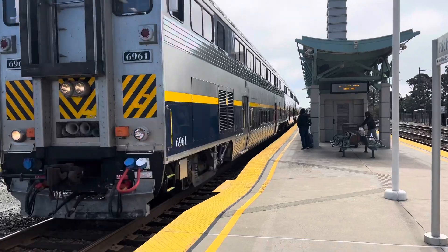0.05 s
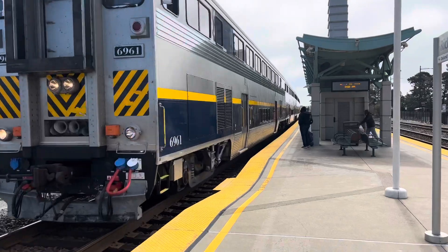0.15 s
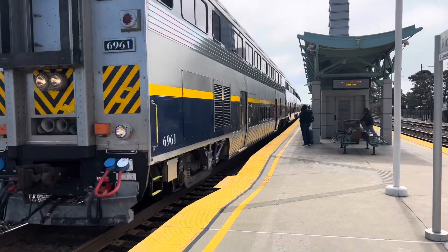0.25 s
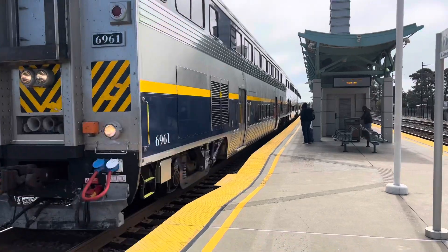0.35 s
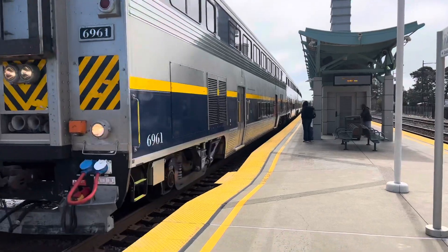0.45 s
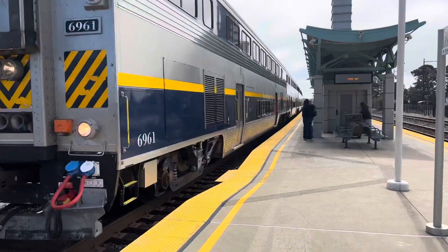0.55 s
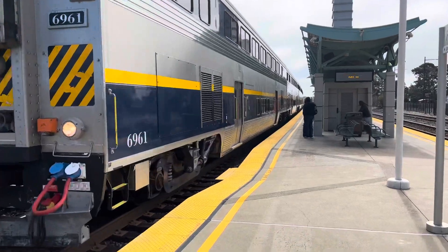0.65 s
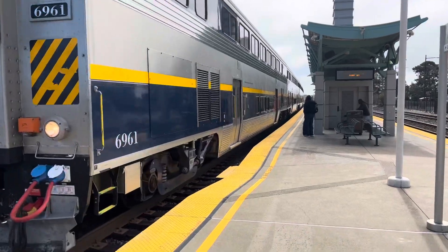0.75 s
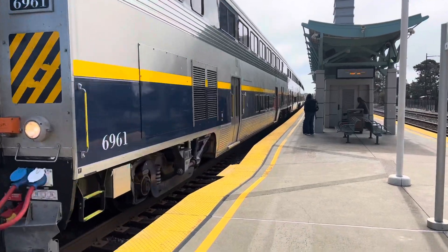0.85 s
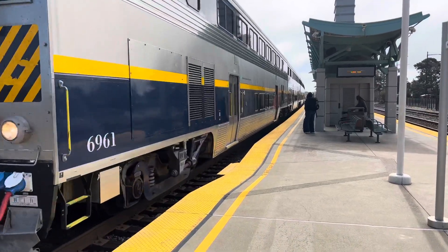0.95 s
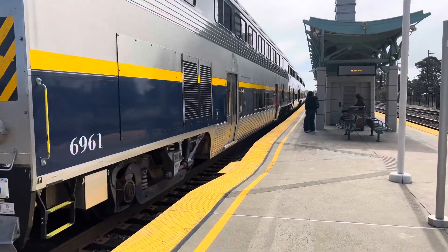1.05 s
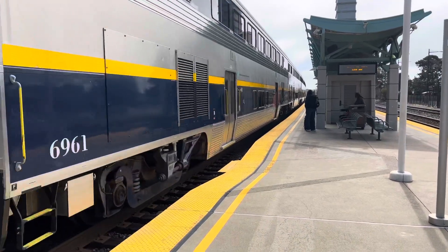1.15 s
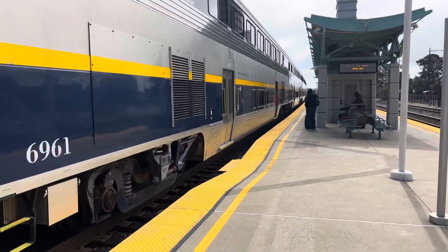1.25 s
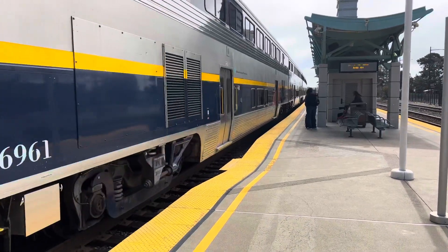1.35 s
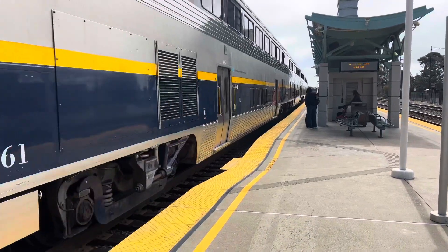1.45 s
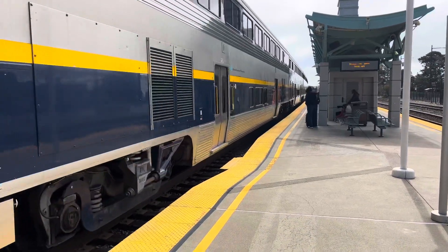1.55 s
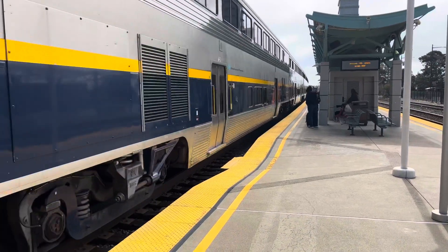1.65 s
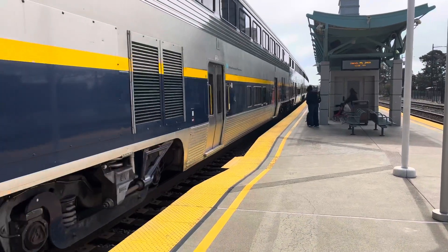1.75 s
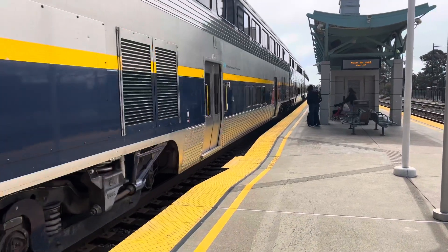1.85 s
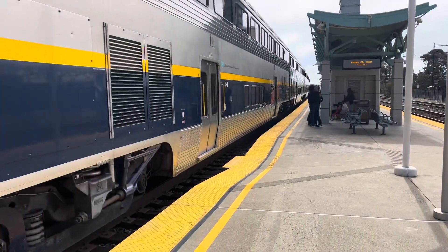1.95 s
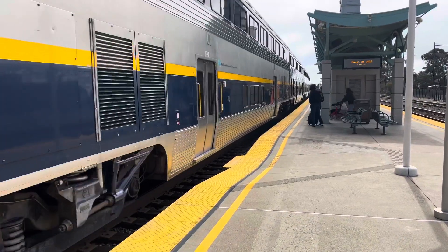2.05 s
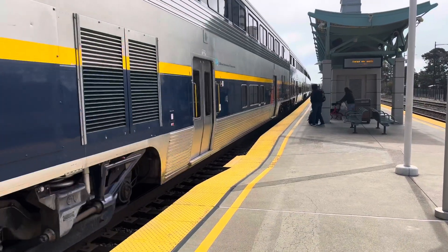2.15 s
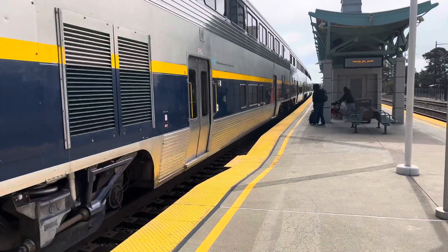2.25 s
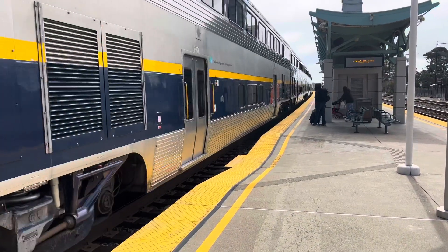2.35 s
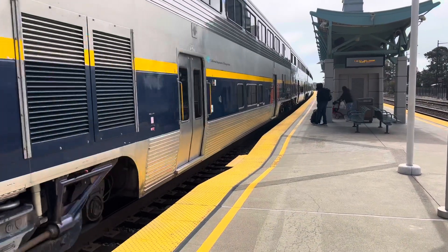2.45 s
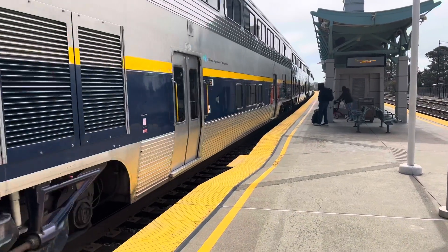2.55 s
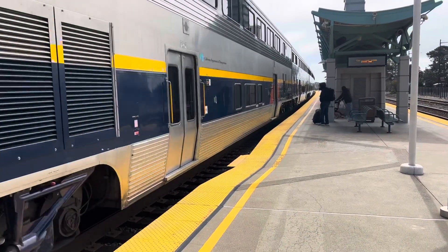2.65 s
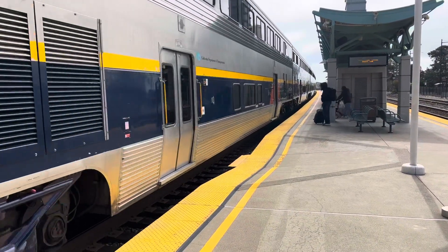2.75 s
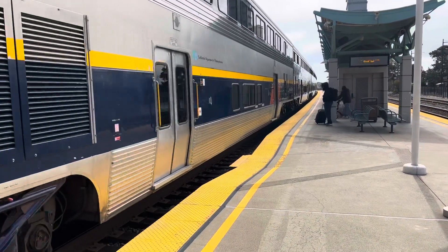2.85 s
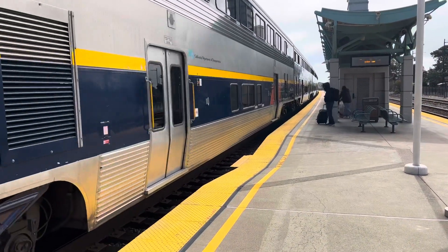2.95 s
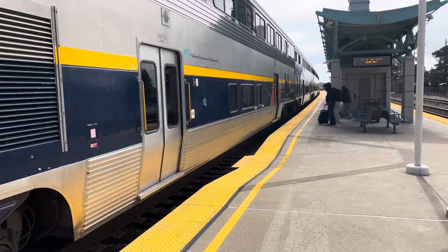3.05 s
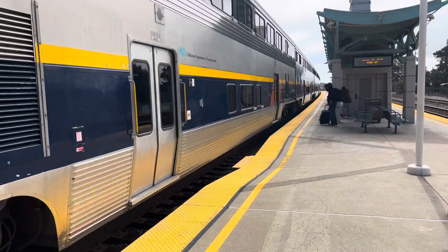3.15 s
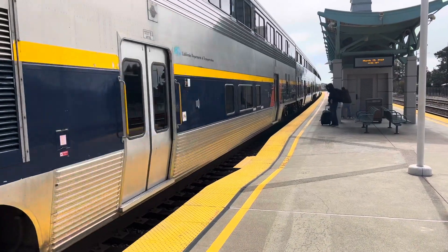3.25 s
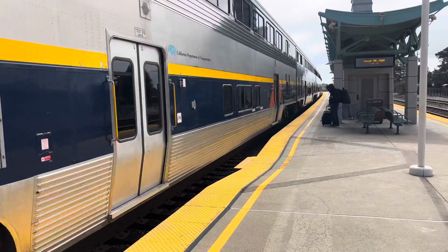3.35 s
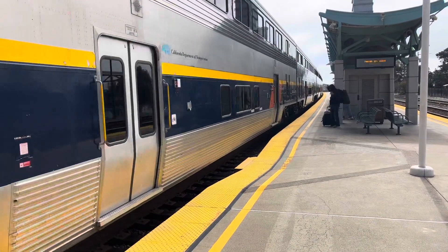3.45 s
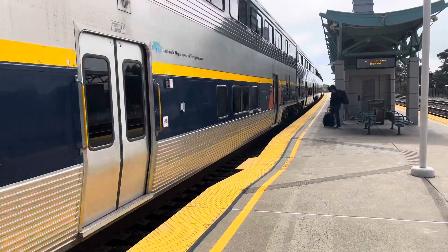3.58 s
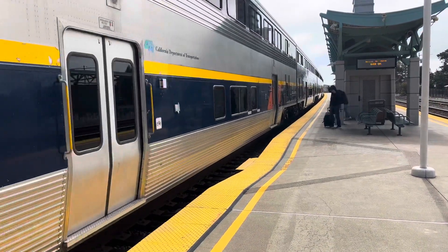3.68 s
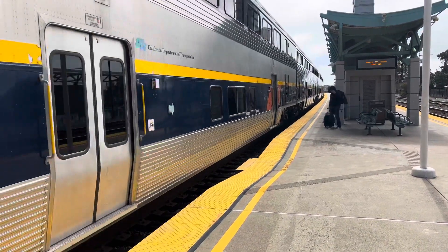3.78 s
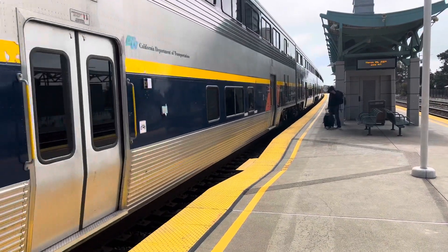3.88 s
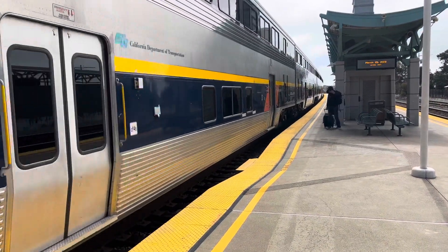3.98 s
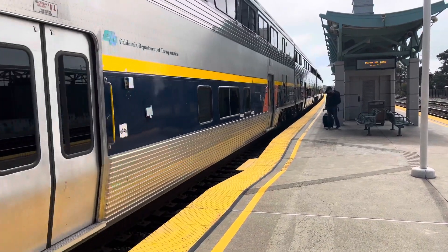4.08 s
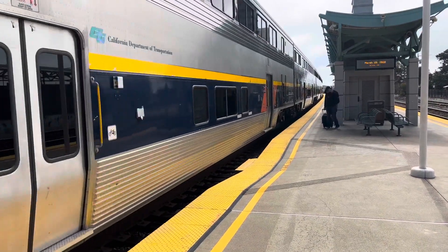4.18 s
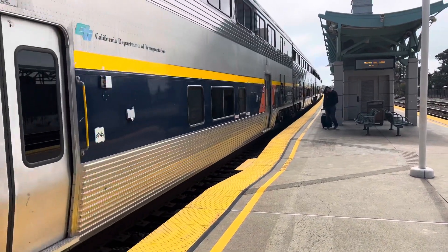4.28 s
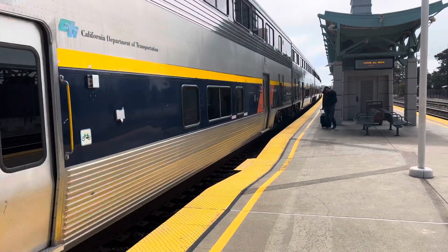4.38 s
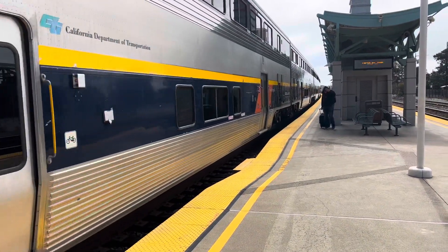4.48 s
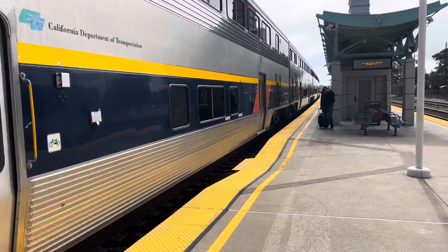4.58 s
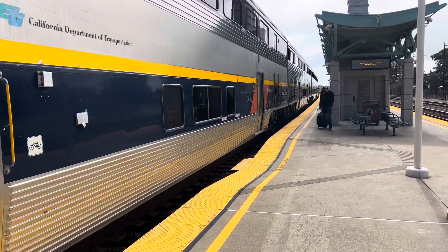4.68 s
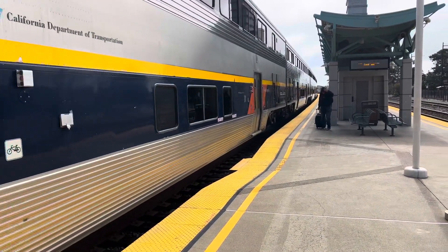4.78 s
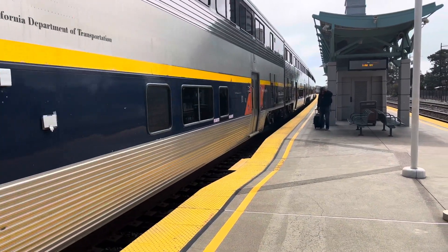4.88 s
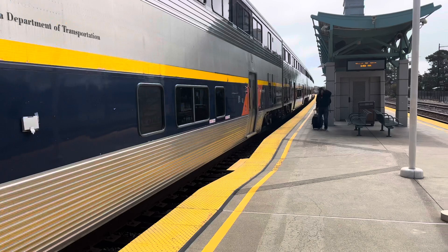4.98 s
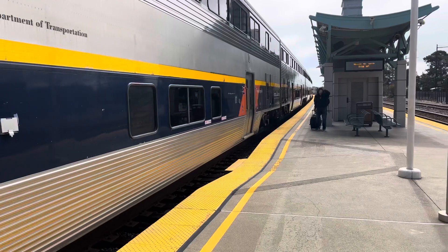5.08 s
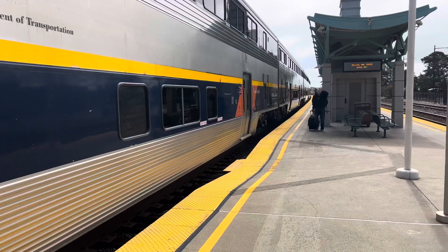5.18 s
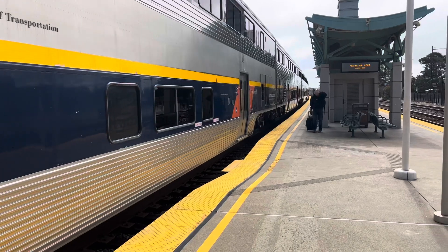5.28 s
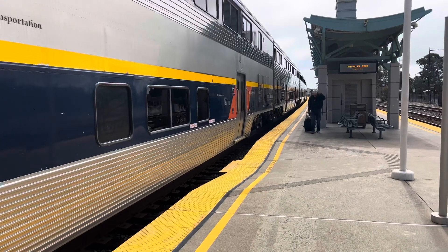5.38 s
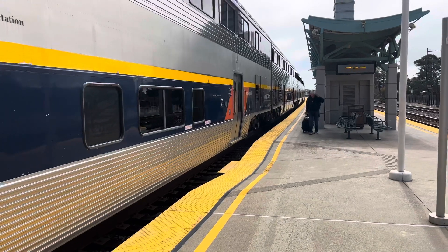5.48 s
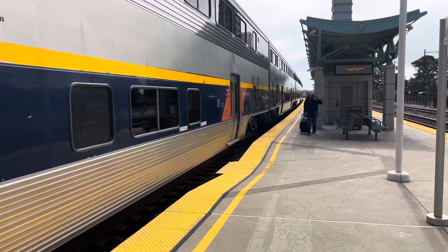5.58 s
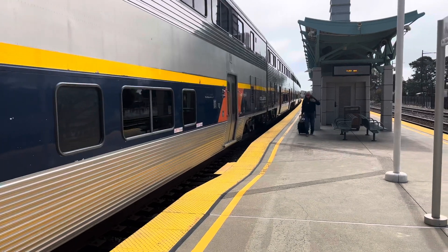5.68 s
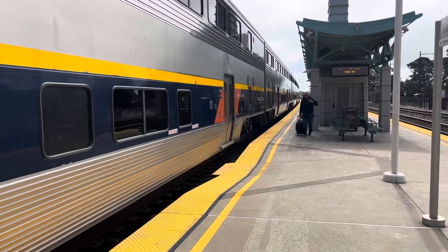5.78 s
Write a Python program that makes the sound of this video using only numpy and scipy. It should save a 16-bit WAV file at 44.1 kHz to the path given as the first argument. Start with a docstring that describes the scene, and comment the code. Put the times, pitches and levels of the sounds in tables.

```python
"""The air-driven bell of a passenger train rings every three quarters of a second as it creeps past a platform.
Each blow restarts decaying partials that fade and smear, likely by echoes off the moving cars; noise makes the knock.
A valve puffs and hisses before each blow heard to start: shaped noise through cavities, with ringing metal ticks.
Two spaced microphones also pick up buffeting draught and rolling wheels (noise), a faint squeal and a machine hum."""
import sys
import numpy as np
from scipy import signal
from scipy.io import wavfile
from scipy.ndimage import uniform_filter1d, minimum_filter1d

SR = 44100
rng = np.random.default_rng(int(sys.argv[2]) if len(sys.argv) > 2 else 0)


def linear_from_db(decibels):
    """Turn decibels (scalar or array-like) into linear amplitude factors; 0 gives 1."""
    return 10 ** (np.asarray(decibels, float) / 20)


def pcm_store(signal):
    """Save signal as 16-bit PCM."""
    levels = np.round(np.clip(np.atleast_2d(signal), -1, 1) * 32767)
    wavfile.write(sys.argv[1], SR, levels.astype(np.int16).T)


N = 256662
T = np.arange(N) / SR
DULL_HZ = 7000  # the treble slope of distance starts here

# Blows of the clapper. Each row: start in seconds, knock level in dB before its trim, gains in dB of the second,
# third, fourth and higher partials, then radians by which left leads in the second, third and fourth.
BLOWS = [(-0.34, -35, 2, -2, 0.5, 4, 4, 2.7, 4.5), (0.398, -6.5, -0.5, -0.5, 0, 1, 1.5, -1.5, 1.34),
         (1.1336, -4.5, 3.5, 4, -1.5, 0, -2.5, 4, 1.3), (1.8724, -3.5, -1.5, 5.5, -1.5, 1, -2, -1.2, 1.5),
         (2.6173, -5, -2.5, 6, -4, -1.5, 0.3, 1.63, -0.9), (3.355, -9, -3.5, 2.5, -2.5, -2.5, 1, -1, -1.64),
         (4.1015, -16.5, -5.5, 2.5, -6, -8.5, -1.5, 0, -2.1),
         (4.8434, -20, -10, -9.5, -6, -8, 1, 0.57, -2.5), (5.588, -27.5, -3, -8, -9.5, -8, -3.0, 1.56, -3)]
# The bell going by. Each row: time in seconds, Doppler shift in percent, lead of the left microphone in ms,
# level of left over right in dB.
PASSING = [(0, 0.46, 0.23, -3.5), (1.2, 0.39, 0.22, -1), (2.1, .33, 0.24, -2.1), (3, 0.0064, 0.43, 0.5),
           (3.5, -.22, 0.4, 0), (5.82, -0.29, .4, -1)]
# Openings of the valve. Each row: start in seconds, air level in dB before the stroke and cavities shape it,
# treble slope in dB per octave.
PUFFS = [(0.125, -31.5, -9.5), (0.8614, -31.5, -8.5), (1.598, -31.5, -1), (2.3406, -32, -3),
         (3.0786, -34, -5), (3.823, -40, -8.5), (4.564, -41, -14.5), (5.3088, -43.5, -16)]


def rows_at(rows, t):
    """Each column of a curve table at the times t."""
    s, *columns = np.transpose(rows)
    return np.array([np.interp(t, s, c) for c in columns])


def read(points, hz):
    """A spectrum interpolated on a log-frequency axis."""
    f, value = np.transpose(points)
    return np.interp(np.log(hz + 1), np.log(f + 1), value)


def unit(points, hz):
    """A spectrum in dB shifted so that its bins have a mean power of one."""
    db = read(points, hz)
    return db - 10 * np.log10(np.mean(linear_from_db(db) ** 2))


def evened(x):
    """Scaled to rms 1."""
    return x / np.sqrt(np.mean(abs(x) ** 2) + 1e-20)


def add(mix, s, sound):
    """Adds a sound that starts at s seconds, cut to the length of the mix."""
    at = round(s * SR)
    part = mix[..., max(at, 0):max(at + sound.shape[-1], 0)]
    part += sound[..., max(-at, 0):][..., :part.shape[-1]]


def noise(level_db, size, same, patchy_db, flicker_db):
    """Random short-time spectra shaped by level_db(hz, t); the part common to both sides arrives left first."""
    hop = size // 4
    hz = np.fft.rfftfreq(size, 1 / SR)[:, None]
    t = np.arange(N // hop + 5) * hop / SR
    a, b, c, d, patches = rng.standard_normal((len(t), len(hz), 5)).T
    # patches cover neighbouring bins and frames; flicker moves all bins of one side together
    patches = uniform_filter1d(patches, size=5, axis=0)
    patches = evened(uniform_filter1d(patches, size=6, axis=1))
    flicker = evened(uniform_filter1d(rng.standard_normal((2, 1, len(t))), size=2, axis=2))
    lead_s = rows_at(PASSING, t)[1] / 1000
    late = np.exp(-2j * np.pi * hz * lead_s)
    same = np.clip(same, 0, 1)
    left, own = a + 1j * b, c + 1j * d
    right = same * late * left + np.sqrt(1 - same ** 2) * own
    z = np.array([left, right])
    z *= linear_from_db(level_db(hz, t)) * evened(linear_from_db(patchy_db * patches + flicker_db * flicker))
    return signal.istft(z, nperseg=size, noverlap=size - hop)[1][:, :N] / np.sqrt(size / 3)


def wander(width_hz, shared=0.):
    """Complex slow chance for each side, low-passed at width_hz; a shared part of the power is common to both."""
    step = 64  # samples between the drawn values
    z = rng.standard_normal((3, N // step + 2, 2)) @ [1, 1j]
    smoother = signal.butter(3, np.clip(width_hz, .5, 300), fs=SR / step, output="sos")
    z = evened(signal.sosfilt(smoother, z))
    z = np.sqrt(1 - shared) * z[1:] + np.sqrt(shared) * z[0]
    return np.array([np.interp(np.arange(N) / step, np.arange(len(v)), v) for v in z])


def bell(rise_s=0.0052):
    """Every blow restarts the modes; echoes off moving walls are slightly detuned, more so for high modes."""
    # The bell's modes. Each row: frequency in Hz, level in dB, t60 in seconds, left over right in dB.
    modes = [(1105.3, -20.5, 3.06, 2.6), (2082, -13.5, 0.59, 0), (2330.8, -20, 1.126, -2),
             (3823, -21.5, 1.01, 0.5), (2820, -39, 0.083, -1), (4820, -37.5, 0.34, 20),
             (5625, -28, 0.83, 7.5), (5710, -32, 0.28, 16), (6333, -33, 0.44, 2.5),
             (6270, -54.5, 0.68, 4.5), (7686, -35, 0.64, 4), (9860, -48.5, 0.53, 8.5),
             (12290, -49.5, .4, 0.5), (14680, -56, .35, -4.5)]
    # Share of detuned echoes in the first four partials and in the higher ones.
    scatter = [.36, .55, .55, .72, .75]
    # The lowest partial swells and fades as the train moves. Each row: time in seconds, gain in dB.
    fades_first = [(0, -14.5), (.2, -2.5), (.36, -7), (.43, 1), (.67, -10), (.84, 10), (1.05, 0),
                   (1.2, 3.5), (1.42, -4), (1.69, 14), (1.9, 3.5), (1.99, -8), (2.3, 7), (2.48, 3),
                   (2.68, 8), (2.79, 1), (2.88, 7), (3.15, 8), (3.24, -1.5), (3.4, 6.5), (3.65, 7),
                   (3.8, -13), (4.0, -0.5), (4.19, -11.5), (4.29, -2), (4.45, -19), (4.65, 0), (4.8, -19),
                   (5.09, 0.5), (5.26, -19.5), (5.4, -6.5), (5.62, -13.5), (5.76, -8), (5.82, -26)]
    # The third partial wavers the same way. Each row: time in seconds, gain in dB.
    fades_third = [(0, 8.5), (.45, -1), (.72, 1.5), (1.05, 4), (1.16, 5), (1.25, -11), (1.33, -2),
                   (1.7, 6.5), (1.93, 2), (2.0, -6), (2.13, 0.5), (2.4, -4.5), (2.64, 5.5), (2.69, -3.5),
                   (2.88, -6), (3.1, 0), (3.38, 8.5), (3.52, -13.5), (3.61, -0.5), (4.0, -10.5),
                   (4.3, -5.5), (4.54, -12), (4.9, 2.5), (5.3, 5.5), (5.4, -19), (5.6, -3), (5.82, 5)]
    # Extra level in dB at the start of a blow, in the same five groups of partials.
    early_db = [2.5, 3, 2.3, 4, 3]
    early_s = 0.022  # time constant of that extra level
    spread = .0095  # detuning of the echoes as a share of the pitch

    shift, lead_ms, pan_db = rows_at(PASSING, T)
    clock = np.cumsum(1 + shift / 100) / SR  # seconds stretched by the Doppler shift
    blows = np.array(BLOWS)
    latest = np.searchsorted(blows[:, 0], T + .002) - 1
    echo_lead = uniform_filter1d(blows[latest, 6:], size=180, axis=0)
    out = np.zeros((2, N))
    for k, (hz, db, t60, side_db) in enumerate(modes):
        group = min(k, len(scatter) - 1)
        after = T[:round(1.5 * t60 * SR)]
        ring_db = db - 60 * after / t60 + early_db[group] * np.exp(-after / early_s)
        ring = linear_from_db(ring_db) * (1 - np.exp(-after / rise_s))
        power = np.zeros(N)
        for s, _, *strength_db in blows:
            strength = linear_from_db(strength_db[group - 1]) if group else 1
            add(power, s, (ring * strength) ** 2)
        if hz > DULL_HZ:  # distance dulls the top
            power *= linear_from_db(rows_at(PUFFS, T)[1] * np.log2(hz / DULL_HZ)) ** 2
        if k in (0, 2):
            power *= linear_from_db(rows_at(fades_third if k else fades_first, T)[0]) ** 2
        share = scatter[group]
        echoes = np.sqrt(1 - share ** 2) + share * wander(spread * hz, shared=.5)
        # three strong partials reach the pair mostly by echoes, from a new side after each blow
        lead = echo_lead[:, k - 1] if 0 < k < 4 else 2 * np.pi * hz * lead_ms / 1000
        phase = 2 * np.pi * (hz * clock + rng.random())
        swing = np.exp(1j * (phase - np.array([0 * T, lead])))
        sides = linear_from_db([[side_db / 2], [-side_db / 2]])
        out += np.sqrt(2 * power) * sides * (echoes * swing).real
    return out * linear_from_db(np.array([pan_db, -pan_db]) / 2)


def clank(db=-4, t60=0.11, rise_s=0.0059):
    """The clapper's broad knock; one short decay stands for it and its echo from the platform."""
    # Spectrum of the knock. Each row: frequency in Hz, relative level in dB per Hz.
    colour = [(250, -48), (900, -4), (1600, -10), (2300, 13), (3000, -14.5), (6000, -10.5), (9000, -30.5),
              (16000, -68)]
    knock = np.zeros(N)
    for s, blow_db, *_ in BLOWS:
        fall = linear_from_db(blow_db - 60 * np.maximum(T - s, 0) / t60)
        knock += fall * np.clip((T - s) / rise_s, 0, 1)
    hiss = noise(lambda hz, t: unit(colour, hz), size=256, same=0.45, patchy_db=5.0, flicker_db=1.0)
    return linear_from_db(db) * knock * hiss


def stroke(after, rise_s=.003):
    """Air flow of one valve stroke: bursts that rise fast, hold and fall, over a thin leak."""
    # Blast, second puff and hiss. Each row: seconds after opening, level in dB, hold in seconds, fall in dB per s.
    bursts = [(0, 3, 0.0048, 266.5), (0.121, -17, 0.01, 399), (0.194, -12.5, 0.065, 553.5)]
    leak_db, leak_s = -30.5, 0.37  # thin flow while the valve is open
    flow = linear_from_db(leak_db) * np.clip(np.minimum(after + .02, leak_s - after) / .02, 0, 1)
    for s, db, hold_s, fall_db in bursts:
        fall = linear_from_db(db - fall_db * np.maximum(after - s - hold_s, 0))
        flow = flow + fall * np.clip(1 + (after - s) / rise_s, 0, 1)
    return flow


def valve(turn_s=.22):
    """Air escapes in a sharp blast, a weaker second puff, then a hiss that drives the clapper."""
    # Spectrum of the first blast as heard, with gaps near 10.2 and 13.5 kHz that are not the air's own.
    # Each row: frequency in Hz, relative level in dB per Hz.
    blast_heard = [(900, -57), (1400, -13.5), (1900, -8), (2700, -17), (3400, -9.5), (4900, -8.5),
                   (6300, -12), (7350, -17.5), (8900, -7.5), (10200, -31), (11100, -8.5), (12400, -17.5),
                   (13500, -54), (15000, -15)]
    # Spectrum of the later hiss as heard, with gaps near 10.2 and 13.5 kHz that are not the air's own.
    # Each row: frequency in Hz, relative level in dB per Hz.
    hiss_heard = [(900, -11), (1500, -6.5), (2150, -16), (2860, -14.5), (3530, -16.5), (4880, -19),
                  (8800, -16.5), (9600, -19.5), (10200, -48), (10800, -20.5), (12300, -17), (13500, -43),
                  (15000, -26)]
    # Cavities of the valve body that the air rings. Each row: frequency in Hz, width in Hz, boost in dB.
    cavities = [(2476, 355, 12.5), (2930, 85, 7), (2792, 350, 10.5), (4853, 760, 12), (5500, 300, 2.5),
                (6145, 350, 9)]
    # The valve's metal rings as it opens. Each row: frequency in Hz, dB over the puff's level, t60 in seconds.
    metal = [(4770, -20, .22), (2650, -14, .1), (6500, -32, 0.054)]

    blast, hiss, ticks = np.zeros((2, N)), np.zeros((2, N)), np.zeros((2, N))
    after = T[:SR // 2] - .02  # the flow starts just ahead of the opening
    late = np.clip(after / turn_s, 0, 1)  # the blast's spectrum turns into the hiss's
    for s, peak_db, _ in PUFFS:
        flow = linear_from_db(peak_db) * stroke(after)
        add(blast, s + after[0], flow * np.sqrt(1 - late))
        add(hiss, s + after[0], flow * np.sqrt(late))
        for hz, db, t60 in metal:
            t = T[:SR // 4]
            detune, turn = rng.random((2, 2, 1))  # each side has its own pitch and phase
            swing = np.sin(2 * np.pi * (hz * (1 + 0.024 * (detune - .5)) * t + turn))
            add(ticks, s, linear_from_db(peak_db + db - 60 * t / t60) * np.minimum(t / .002, 1) * swing)

    def air(heard):
        """Noise through the cavities; its treble dulls with the bell's distance."""
        def level_db(hz, t):
            rings_db = sum(db / (1 + (2 * (hz - f) / width) ** 2) for f, width, db in cavities)
            octaves = np.maximum(np.log2((hz + 1) / DULL_HZ), 0)
            return unit(heard, hz) + rings_db + rows_at(PUFFS, t)[1] * octaves
        return noise(level_db, size=512, same=0.11, patchy_db=4, flicker_db=2.5)
    return blast * air(blast_heard) + hiss * air(hiss_heard) + ticks


def draught(db=-3.5, usual_db=-7, reach=0.57):
    """The train's wind: low buffeting, nearly unrelated at the two microphones; bright gusts reach higher."""
    # Steady draught. Each row: time in seconds, level in dB before the trim, brightness in dB.
    steady = [(0, -41.5, -10.5), (.35, -35, -11), (.6, -27.5, -14.5), (1.3, -28.5, -14), (2.3, -26, -14),
              (2.8, -30, -17), (3.3, -35.5, -8.5), (3.8, -36.5, -17), (4.2, -50, -4), (5.0, -40, -12),
              (5.82, -47, -7)]
    # Gusts. Each row: peak in seconds, level in dB before the trim, half length in seconds, brightness in dB.
    gusts = [(0.14, -27, 0.12, -18), (0.642, -20.5, 0.019, -16.5), (0.908, -19.5, 0.11, -13),
             (1.13, -18.5, 0.025, -9), (1.598, -20.5, 0.16, -17.5), (1.868, -27.5, 0.031, -10),
             (2.405, -21, 0.027, -23), (2.615, -24, 0.047, -8), (2.915, -26, 0.015, -19),
             (3.277, -27.5, 0.035, -41), (3.555, -23.5, 0.11, -8.5), (4.632, -36.5, .025, -4.5),
             (5.02, -32.5, .04, -22), (5.255, -29.5, 0.098, -27)]
    # Spectrum of the buffeting. Each row: frequency in Hz, relative level in dB per Hz.
    colour = [(18, -37.5), (40, -4), (80, -10), (200, -6), (400, -8), (800, -24.5), (1500, -64),
              (4000, -110)]

    def level_db(hz, t):
        high = reach * np.clip(np.log2((hz + 1) / 140), 0, 2)
        steady_db, bright_db = rows_at(steady, t)
        power = linear_from_db(steady_db + (bright_db - usual_db) * high) ** 2
        for s, gust_db, half_s, bright_db in gusts:
            swell = np.exp(-2 * ((t - s) / half_s) ** 2)
            power += linear_from_db(gust_db + (bright_db - usual_db) * high) ** 2 * swell
        return db + unit(colour, hz) + 10 * np.log10(power)
    sides = linear_from_db([[.9], [-.9]])  # dB, left a little louder
    return noise(level_db, size=1024, same=0.044, patchy_db=1.5, flicker_db=5.0) * sides


def rolling(low_db=18, high_db=17):
    """Rumble of wheels on rails and a thin whisper of steel and brakes, both shaped noise."""
    # Rolling. Each row: time in seconds, rumble in dB and whisper in dB, both before their trims.
    course = [(0, -45, -47.5), (.5, -50, -56.5), (.75, -53.5, -44.5), (1.0, -41, -39), (1.3, -51.5, -52.5),
              (1.73, -46.5, -47.5), (2.1, -52, -54), (3, -51, -58.5), (4.5, -58, -59), (5.82, -55.5, -52.5)]
    # Spectrum of the rumble. Each row: frequency in Hz, relative level in dB per Hz.
    rumble = [(30, -9.5), (90, 19.5), (200, -4), (500, -1), (1000, 0), (1400, -8.5), (2200, -40),
              (5000, -92)]
    # Spectrum of the whisper. Each row: frequency in Hz, relative level in dB per Hz.
    whisper = [(300, -75), (800, 0), (1300, -7), (2600, -7.5), (4500, -18), (7000, -19.5), (9500, -34.5),
               (12000, -39), (16000, -50)]

    def level_db(hz, t):
        low, high = rows_at(course, t)
        rumble_power = linear_from_db(low + read(rumble, hz) + low_db) ** 2
        whisper_power = linear_from_db(high + read(whisper, hz) + high_db) ** 2
        return 10 * np.log10(rumble_power + whisper_power)
    return noise(level_db, size=1024, same=0.33, patchy_db=4.0, flicker_db=1.0)


def squeal():
    """A wheel's faint rising squeal: a tone made fuzzy by random modulation, with a weak octave."""
    # Each row: time in seconds, frequency in Hz, level in dB before the octave and the modulation.
    glide = [(.66, 1680, -80), (.72, 1680, -44), (.82, 1680, -50), (.9, 1787, -40), (1.0, 1860, -47),
             (1.1, 1920, -45), (1.16, 1910, -80)]
    hz, db = rows_at(glide, T)
    turn = np.exp(2j * np.pi * np.cumsum(hz) / SR)
    return linear_from_db(db) * (wander(width_hz=39) * (turn + 0.16 * turn ** 2)).real


def hum(db=3, hz=88.7):
    """A wavering low tone of a machine under the cars, alike on both sides."""
    # Each row: time in seconds, level in dB before the trim and the wavering.
    course = [(0, -50.5), (3.8, -63), (4.0, -61), (5.25, -48.5), (5.5, -56.5), (5.72, -41.5), (5.82, -45)]
    level = linear_from_db(db + rows_at(course, T)[0])
    waver = 1.37 + 1.0 * wander(width_hz=10)[0]
    return level * (waver * np.exp(2j * np.pi * hz * T)).real


def scene():
    """All sources at the two microphones."""
    return bell() + clank() + valve() + draught() + rolling() + squeal() + hum()


def band_limit(x):
    """A steep low-pass at the top of the band."""
    return signal.sosfilt(signal.butter(12, 17120, fs=SR, output="sos"), x)


def record(dry):
    """Bass and treble limits of the recorder, then a peak limiter that turns both sides down together."""
    low_hz, high_hz, ceiling_db = 42, 15900, -1
    bass_cut = signal.butter(4, low_hz, "high", fs=SR, output="sos")
    treble_cut = signal.firwin(255, high_hz, window=("kaiser", 8), fs=SR)
    dry = signal.sosfilt(bass_cut, dry)
    dry = signal.oaconvolve(dry, treble_cut[None], "same")
    room = np.minimum(linear_from_db(ceiling_db) / (abs(dry).max(axis=0) + 1e-9), 1)
    gain = uniform_filter1d(minimum_filter1d(room, size=801), size=401)
    return band_limit(dry * gain)


dry = scene()
out = record(dry)
pcm_store(out)
```